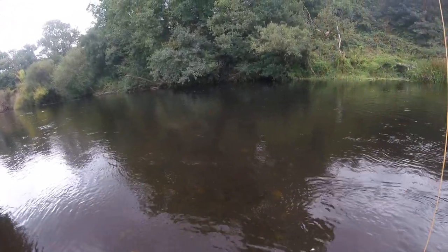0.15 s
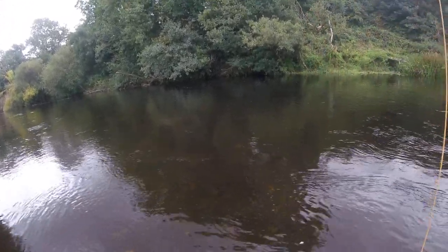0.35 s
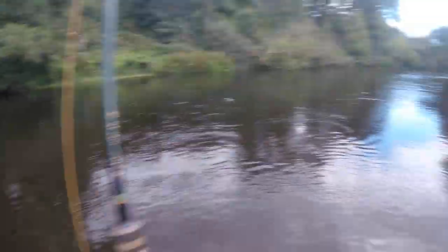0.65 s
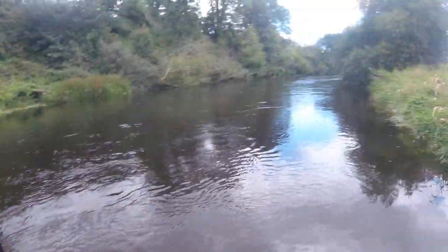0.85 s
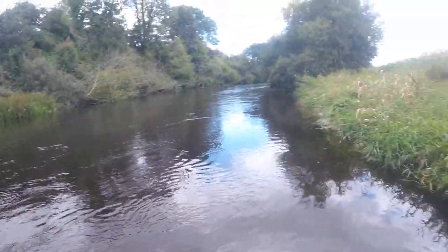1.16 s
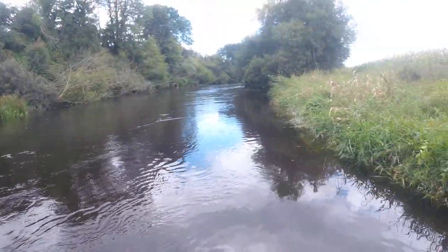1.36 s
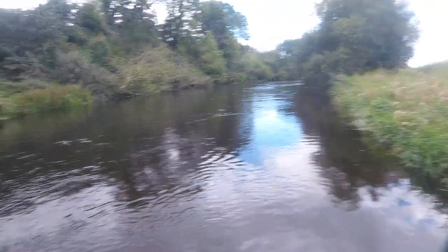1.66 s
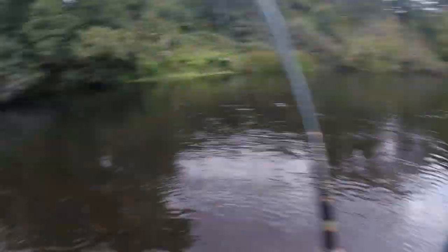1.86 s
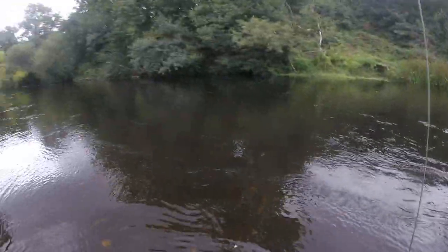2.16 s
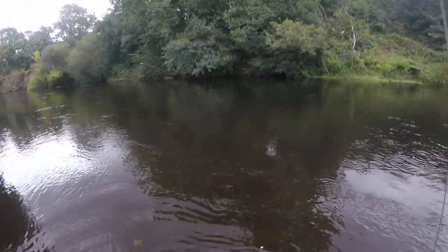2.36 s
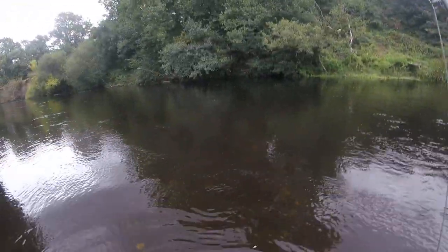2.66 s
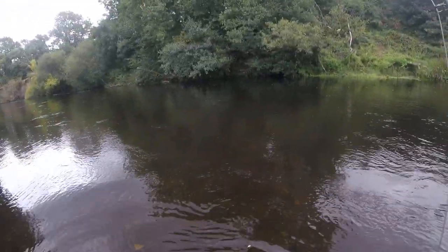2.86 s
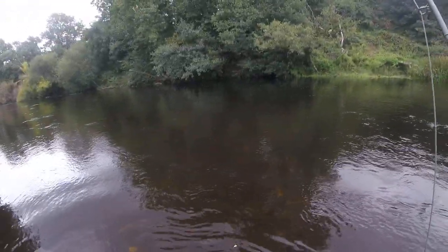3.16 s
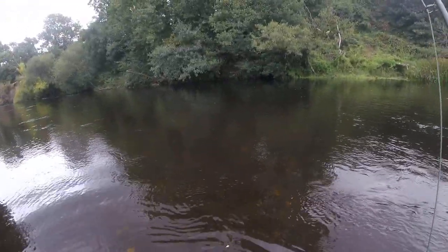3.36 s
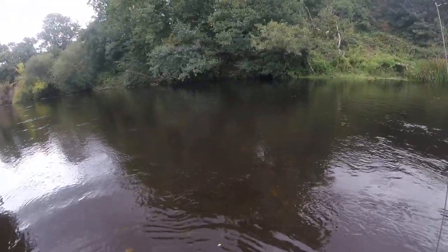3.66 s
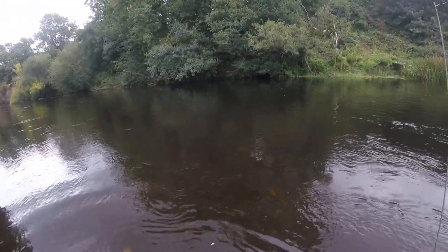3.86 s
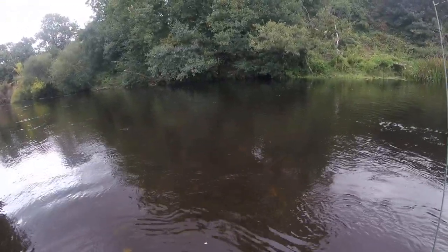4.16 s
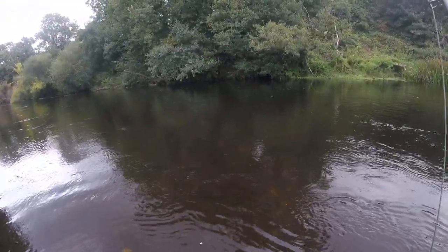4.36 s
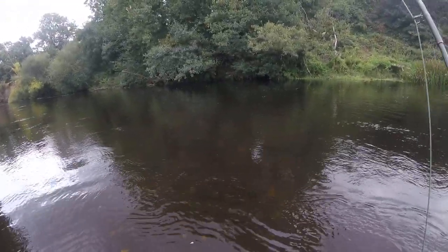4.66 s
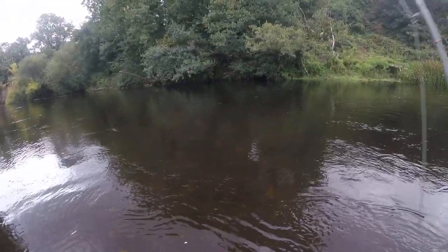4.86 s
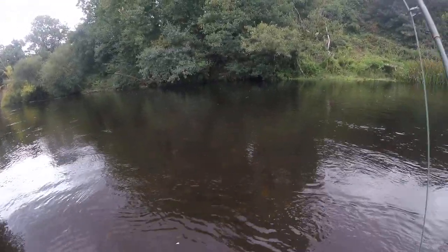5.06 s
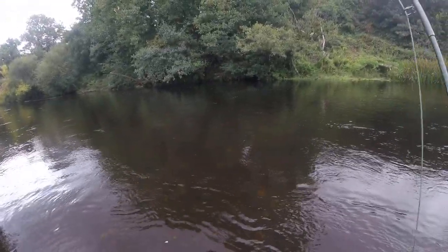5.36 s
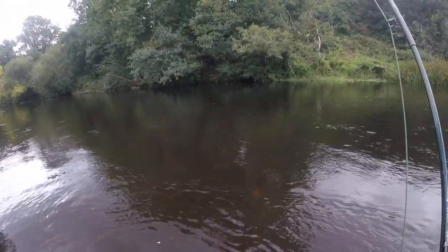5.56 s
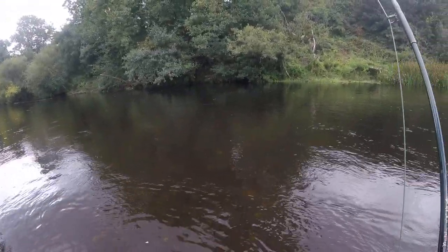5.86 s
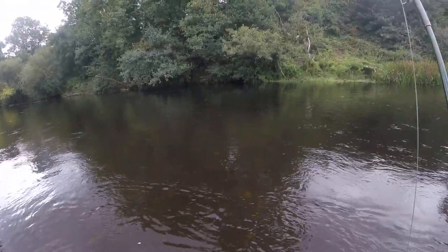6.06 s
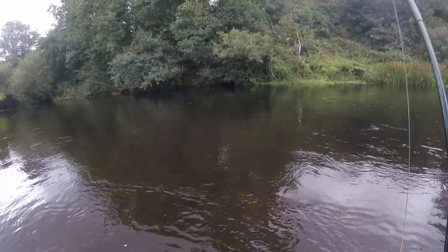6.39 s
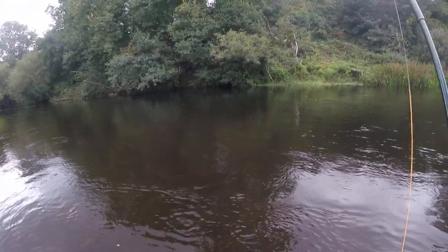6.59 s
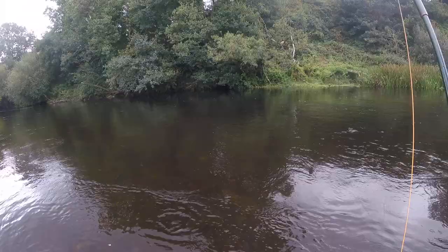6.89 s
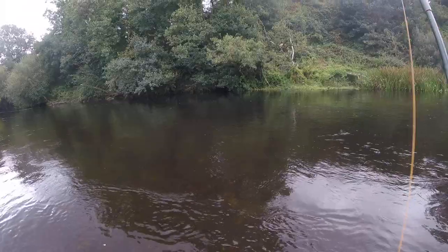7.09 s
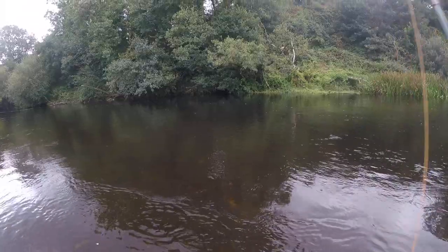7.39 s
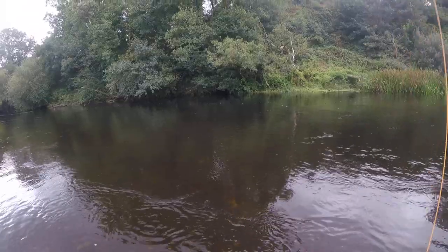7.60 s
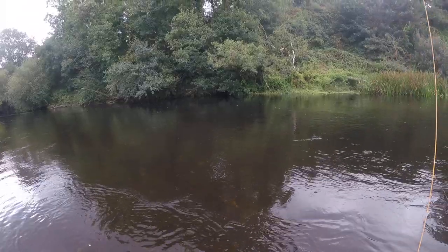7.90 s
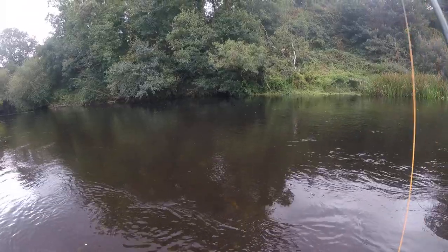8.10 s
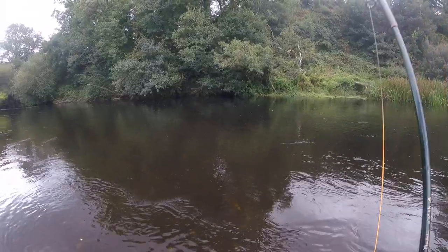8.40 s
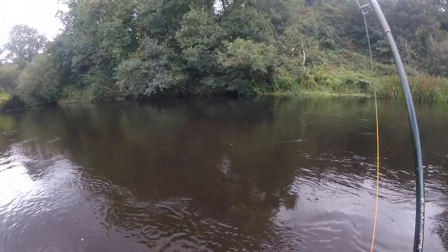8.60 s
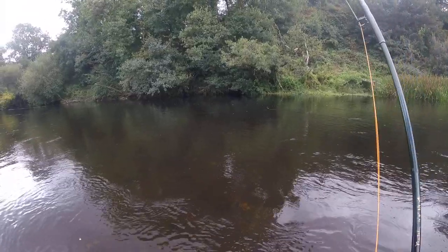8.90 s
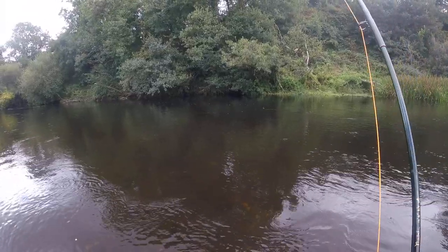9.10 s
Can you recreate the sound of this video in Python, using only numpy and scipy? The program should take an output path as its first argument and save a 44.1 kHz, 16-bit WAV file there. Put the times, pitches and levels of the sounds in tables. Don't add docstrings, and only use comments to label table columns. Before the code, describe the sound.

A quiet riverbank, heard close through a closed housing: soft, muffled water hush and barely audible wind rumble throughout. From 0 to 0.9 s, light brushes and rod knocks, a tiny rising bubble blip near 0.6 and a cloth rustle. At 1.1 a fly reel ratchet starts softly at about 50 clicks a second, quickening to a firm, wavering metallic buzz above 100 until 2.7, with dull hand bumps and a hard handle knock at 2.6. A faint dove coos around 2.9-3.8. Sharp, loud, irregular ticks run from 3.9 to 4.7, then a short hard burst at 4.8-5.0 and two lone clicks. A fast zip rises and falls at 5.5-6.2, a softer one at 6.3-6.8. One soft tick follows at 7.2. Around 8.0-8.4 come knocks and a very faint, loose turn. A softer, jerky buzz surges from 8.7 to the end at 9.2.

```python
import sys
import numpy as np
from scipy import signal
from scipy.fft import rfft, irfft
from scipy.io import wavfile
from scipy.ndimage import uniform_filter1d

SR = 44100
rng = np.random.default_rng(int(sys.argv[2]) if len(sys.argv) > 2 else 0)


def voltage_ratio(level):
    return 10 ** (np.asarray(level, float) / 20)


def int16_out(signal):
    q = np.round(np.clip(np.atleast_2d(signal).T, -1, 1) * 32767)
    wavfile.write(sys.argv[1], SR, q.astype(np.int16))


N = 407484


def evened(x):
    return x / np.sqrt(np.mean(x ** 2) + 1e-20)


def add(mix, s, sounds):
    at = np.round(np.asarray(s) * SR).astype(int)[:, None] + np.arange(sounds.shape[1])
    np.add.at(mix, np.clip(at, 0, N - 1), sounds * (at < N))


def read(points, hz):
    f, db = np.transpose(points)
    return np.interp(np.log(hz + 1), np.log(f + 1), db)


# (time [s], level [dB])
RUMBLE = [(0.0, -65.5), (2.57, -71), (3.32, -74), (8.1, -76), (8.9, -69), (9.24, -70)]
GUST_DB, GUST_S = 2.5, 0.15


def rumble():
    low = signal.sosfilt(signal.butter(1, 45, fs=SR, output="sos"), rng.standard_normal(N))
    low = signal.sosfilt(signal.butter(2, 62, fs=SR, output="sos"), low)
    t = np.arange(N) / SR
    gusts = np.interp(t / GUST_S, np.arange(200), rng.standard_normal(200))
    level_db = np.interp(t, *np.transpose(RUMBLE)) + 1.5 + GUST_DB * gusts
    return voltage_ratio(level_db) * evened(low)


# (frequency [Hz], density [dB per Hz])
HUSH = [(110, -70), (150, 0.5), (420, -11.5), (1000, -14.5), (2000, -21), (3400, -29), (4300, -33),
        (5300, -23), (6000, -28.5), (7000, -26.5), (9500, -30), (12000, -37.5), (15250, -40.5),
        (15400, -73)]
# (time [s], level [dB], fill [0-1])
AIR = [(0.0, -54.5, 0.75), (1.34, -53.5, 0.75), (1.83, -50, 1), (2.62, -48.5, 1), (2.98, -54.5, 0.65),
       (3.86, -54.5, 0.7), (4.12, -53.5, 1), (6.3, -54.5, 0.88), (6.84, -55.5, 0.48), (8.31, -54, 0.1),
       (8.49, -55, 0.24), (9.24, -53, 0.5)]
DIP_DB, FILL_DB, HISS_DB = -17.5, 22, 0.05


def hush():
    frames, hz = N // 512 + 5, np.fft.rfftfreq(2048, 1 / SR)
    a, b, patches = rng.standard_normal((frames, 1025, 3)).T
    patches = uniform_filter1d(patches, size=20, axis=0)
    patches = evened(uniform_filter1d(patches, size=8, axis=1))
    s, level_db, fill = np.transpose(AIR)
    t = np.arange(frames) * 512 / SR
    high = np.clip(np.log2(hz / 1000 + 1e-3), 0, 2) / 2
    field_db = read(HUSH, hz)[:, None] + patches + HISS_DB * high[:, None]
    dip = np.exp(-((hz - 4800) / 800) ** 2)
    field_db += np.outer(dip, DIP_DB + FILL_DB * np.interp(t, s, fill))
    spectra = (a + 1j * b) * voltage_ratio(field_db)
    noise = evened(signal.istft(spectra, nperseg=2048, noverlap=1536)[1][:N])
    return voltage_ratio(np.interp(np.arange(N) / SR, s, level_db) + 3.5) * noise


# (start [s], length [s], pitch [Hz], level [dB])
DOVE = [
    (2.93, 0.3, 531, -57),
    (3.22, 0.07, 500, -55),
    (3.34, 0.11, 535, -59),
    (3.5, 0.35, 520, -68),
]
COO_PEAK, COO_DROP = 0.9, 0.036


def dove():
    out = np.zeros(N)
    for start, length, hz, db in DOVE:
        u = np.arange(0, length, 1 / SR) / length
        level = np.interp(u, [0, COO_PEAK, 1], [0.2, 1, 0])
        pitch = hz * (1 - COO_DROP * u ** 8)
        coo = np.sqrt(2) * voltage_ratio(db) * level * np.sin(2 * np.pi * np.cumsum(pitch) / SR)
        add(out, [start], coo[None])
    return out


# (start [s], length [s], first pitch [Hz], last pitch [Hz], level [dB])
BUBBLE = (.568, .058, 620, 1560, -54)


def bubble():
    start, length, first_hz, last_hz, db = BUBBLE
    u = np.arange(0, length, 1 / SR) / length
    pitch = first_hz + (last_hz - first_hz) * np.sin(np.pi * u / 2)
    level = voltage_ratio(db - 13 * u) * np.sin(np.pi * u) ** 0.4
    out = np.zeros(N)
    add(out, [start], (level * np.sin(2 * np.pi * np.cumsum(pitch) / SR))[None])
    return out


# (start [s], top [s], end [s], low edge [Hz], high edge [Hz], level [dB])
RUSTLE = (.66, .81, .85, 4700, 7300, -64)


def rustle():
    start, top, end, low_hz, high_hz, db = RUSTLE
    grain_db = 4 * np.repeat(rng.standard_normal(N // 200 + 1), 200)[:N]
    grains = rng.standard_normal(N) * voltage_ratio(grain_db)
    band = signal.sosfilt(signal.butter(2, [low_hz, high_hz], "band", fs=SR, output="sos"), grains)
    swell = np.interp(np.arange(N) / SR, [start, top, end], [0, 1, 0])
    return voltage_ratio(db) * swell * evened(band)


# (time [s], peak [dB], frequency [Hz], t60 [s])
KNOCKS = [
    (0.202, -31, 824, 0.021),
    (0.239, -39, 720, 0.028),
    (0.792, -32, 736, 0.028),
    (2.604, -16.5, 505, 0.034),
    (7.984, -26, 493, 0.046),
    (8.421, -26, 710, 0.02),
    (8.434, -32.5, 742, 0.07),
    (8.455, -34.5, 770, 0.078),
]
BUMPS = [
    (1.286, -40, 183, 0.14),
    (1.484, -70, 162, 0.13),
    (1.623, -24.5, 178, 0.084),
    (1.844, -35.5, 190, 0.12),
    (2.086, -26, 185, 0.1),
    (2.462, -38, 170, 0.16),
]
BRUSHES = [(0.0654, -48, 5060, 0.03), (0.118, -36, 5400, 0.021), (0.2179, -44, 5230, 0.035),
           (0.8044, -45, 6340, 0.068), (0.8287, -41, 5000, 0.025), (0.8444, -58, 4940, 0.03),
           (2.9213, -42, 5000, 0.026), (3.2121, -48, 5400, 0.03), (3.5309, -49, 5740, 0.03),
           (3.7394, -49, 4200, 0.03), (7.2044, -45, 6130, 0.027), (8.4856, -49, 5670, 0.03)]
TAPS = [
    (0.1186, -37, 2660, 0.019),
    (0.24, -35, 1510, 0.022),
    (0.802, -40, 2470, 0.031),
    (0.841, -36, 2580, 0.014),
    (2.9294, -56, 2400, 0.02),
]


def knocks(rows, rise_s, grit, size):
    s, db, hz, t60 = np.transpose(rows)[..., None]
    t = np.arange(6000) / SR
    noise = evened(uniform_filter1d(rng.standard_normal((len(s), len(t))), size=size))
    ring = np.sin(2 * np.pi * hz * t) * (1 - grit + grit * noise)
    out = np.zeros(N)
    add(out, s[:, 0], voltage_ratio(db - 60 * t / t60) * (1 - np.exp(-t / rise_s)) * ring)
    return out


# (time [s], teeth passing [per s])
SPIN = [
    [(1.07, 46.9), (1.424, 55.1), (1.532, 78.2), (1.753, 96.4), (1.984, 97.4), (2.077, 109.2),
     (2.452, 94.8), (2.475, 135.1), (2.695, 98.8), (2.731, 16.4)],
    [(4.799, 22.2), (4.844, 81.3), (4.881, 116.3), (4.917, 92.0), (4.955, 60.4), (5.0, 87.7), (5.028, 58.1)],
    [(5.535, 32.2), (5.643, 69.3), (5.706, 66.7), (5.775, 124.7), (5.859, 161.9), (5.98, 206.9),
     (6.119, 97.9), (6.228, 50.2)],
    [(6.327, 35.5), (6.367, 65.6), (6.393, 66.8), (6.5, 96.0), (6.565, 134.7), (6.656, 133.8),
     (6.679, 116.9), (6.769, 15.1)],
    [(7.999, 30.2), (8.082, 60.4), (8.11, 30.4), (8.188, 47.2), (8.235, 73.2), (8.308, 23.8), (8.332, 39.5)],
    [(8.67, 21.3), (8.797, 122.6), (8.887, 16.2), (8.944, 99.1), (9.165, 64.2), (9.233, 164.7)],
]
# (time [s], snap [dB], ring freed [dB], thud freed [dB])
BLOWS = [
    [(1.07, -32.5, -2, 0.5), (1.28, -34, 1.5, 0.5), (1.49, -32, 2, 0), (1.56, -30, -5, 1.5),
     (1.62, -31, 3, 4), (1.68, -29.5, -3, 0.5), (1.75, -26.5, -3, 3.5), (1.795, -21.5, -13, -1),
     (1.84, -28.5, 5, 4), (1.9, -29.5, 0.5, 2.5), (2.1, -25, -1.5, 0.5), (2.3, -25.5, 0, 0.5),
     (2.52, -25.5, 0, -2), (2.66, -27.5, 5.5, -5), (2.731, -24.5, 0.5, -8)],
    [(4.799, -14.5, 0.5, 0), (4.84, -16.5, -0.5, 2), (4.875, -16, -3, -4), (4.91, -19, 1, 1),
     (4.952, -24, 1.5, -7), (5.028, -19.5, -4.5, 1.5)],
    [(5.535, -19.5, 0.5, 0), (5.622, -18, 3, 3), (5.7, -20.5, 0.5, 2.5), (5.795, -21.5, 1, 1.5),
     (5.9, -24, 0, 1), (6.0, -24.5, 0, 1.5), (6.142, -26.5, -4, -0.5), (6.228, -28, -0.5, 3)],
    [(6.326, -26, -2, 0), (6.415, -29.5, 0.5, -2), (6.52, -27.5, -0.5, -0.5), (6.6, -28.5, 0.5, -1.5),
     (6.68, -28, 0, -4), (6.768, -30, -5.5, -3)],
    [(7.999, -40, -2.5, 3.5), (8.1, -38.5, -2, 0), (8.221, -38.5, -4, 0), (8.369, -37, -3, -2)],
    [(8.67, -29, -3, 6), (8.751, -31, -2, 4), (8.831, -28.5, -3, 2.5), (8.9, -30, 1, 2),
     (8.95, -30, -2, -1), (9.02, -30.5, 1, -0.5), (9.06, -34, 5, -2), (9.12, -34, 5, -0.5),
     (9.18, -32, 3, -3), (9.233, -30.5, 5, -6.5)],
]
# (usual snap [dB], ring over snap [dB], thud over snap [dB])
BODY = [
    (-28.5, -1, -5),
    (-16, -2.5, -18.5),
    (-24.5, -0.5, -7.5),
    (-30, 1, -0.5),
    (-37.5, 7, -2),
    (-29.5, -1, -2),
]
# (time [s],
# extra teeth at the top [per s])
TUGS = [(1.069, -3.5), (1.13, 26.5), (1.337, 19.3), (1.381, -20.0), (1.447, -8.5), (1.537, 39.8),
        (1.614, 45.6), (1.704, -6.4), (1.806, 26.4), (1.897, 33.6), (2.023, 51.9), (2.135, 11.4),
        (2.235, 62.8), (2.328, 44.7), (2.423, 76.2), (2.563, -33.7), (2.631, 70.8), (5.58, 1.5),
        (5.639, 18.9), (5.876, 14.6), (5.93, -1.0), (6.04, -5.5), (6.177, 60.2), (8.797, 21.6),
        (8.881, 142.6), (9.013, 113.1),
        (5.985, -6),
    (6.025, 6),
]
TUG_S = 0.045
RING_LAG, THUD_LAG = 0.59, 0.93


def teeth(spin, blows, body):
    s, per_s = np.transpose(spin)
    t = np.arange(s[0], s[-1], 1 / SR)
    speed = np.interp(t, s, per_s)
    for at, extra in TUGS:
        speed += extra * np.maximum(1 - abs(t - at) / TUG_S, 0)
    angle = np.cumsum(speed) / SR
    when = np.interp(np.arange(int(angle[-1] + 1.3)), angle, t)
    at, *effort = np.transpose(blows)
    snap_db, ring_free_db, thud_free_db = (np.interp(when, at, column) for column in effort)
    usual_db, ring_db, thud_db = body
    harder_db = snap_db - usual_db
    ring_db = ring_db + ring_free_db - RING_LAG * harder_db
    thud_db = thud_db + thud_free_db - THUD_LAG * harder_db
    return np.transpose([when, snap_db, ring_db, thud_db])


TEETH_A_TURN, SHUT_TOOTH = 24, 12
SNAP_SWAY, SNAP_SWAY_TURN = 0.37, 0.71
SWAY_TWICE = 0.29
SWAY_PITCH = 0.026


def spool_sway(hz, speed, sway_db):
    spool = (np.arange(len(speed))[:, None] - SHUT_TOOTH) / TEETH_A_TURN
    swayed = sway_db * np.clip((speed[:, None] - 65) / 40, 0, 1)
    low_ring = abs(hz - 2200) < 300
    high_ring = abs(hz - 2900) < 400
    low_snap = abs(hz - 5100) < 200
    crest = 0.57 * low_ring + 0.071 * high_ring + SNAP_SWAY_TURN * low_snap
    wave = np.cos(2 * np.pi * (spool - crest))
    wave = wave + SWAY_TWICE * np.cos(4 * np.pi * (spool - crest - 0.05))
    level_db = swayed * (low_ring + high_ring + SNAP_SWAY * low_snap) * wave
    bend = SWAY_PITCH * swayed * low_ring * (0.15 - (spool % 1) ** 3)
    return level_db, bend


# (frequency [Hz], density [dB per Hz])
CRACK = [(450, -59), (600, -9.5), (1800, -16), (3200, -7), (4300, -18), (5000, 2), (7000, -4), (8800, -7.5),
         (10500, -11), (11300, -20), (13500, -27), (15000, -33), (16500, -50)]


def cracks(t, rise, scatter, size, calm, slid, slide):
    kept, fresh = rng.standard_normal((len(calm), len(t), 2)).T
    noise = (0.78 * np.sqrt(size) * uniform_filter1d(kept, size=size) + 2 * scatter * fresh).T
    noise = noise * voltage_ratio(-60 * t / 0.01) * rise
    bins = np.fft.rfftfreq(len(t), 1 / SR)
    colour_db = read(CRACK, bins) + slid * read(slide, bins) - 1.3 * np.outer(calm, bins < 4300)
    return irfft(rfft(noise) * voltage_ratio(colour_db), len(t)) * (1 - t / t[-1]) ** 2


STRIKE_S, STRIKE_CURVE = 0.0015, 2.3
CALM = 0.72
DAMP_DB, DAMP_S = 9, 0.01
LOW_RING_GAIN, HIGH_SNAP_LOSS = 0.11, 0.43
EVEN_SPRING = 0.7


def clicks(rows, modes, pawl, slide, size):
    s, snap_db, ring_db, thud_db = np.transpose(rows)
    hz, mode_db, t60 = np.transpose(modes)[..., None, None]
    delay_s, rebound_db, drift, scatter, crack_db, sway_db = pawl
    speed = 1 / abs(np.gradient(s))
    calm = CALM * np.clip((speed - 115) / 40, 0, 1)
    t = np.arange(1300) / SR
    rise = np.minimum(t / STRIKE_S, 1) ** STRIKE_CURVE
    slid = np.linspace(-0.5, 0.5, len(s))[:, None]

    slow, quick = rng.standard_normal((len(s), len(hz), 3, 2)).T
    near_alike = np.sqrt(size) * uniform_filter1d(slow, size=size)
    chance = drift * near_alike + scatter * quick
    tune, weight, phase = chance[..., None] * (1 - calm[:, None] * (hz < 4300))

    swing_db, bend = spool_sway(hz, speed, sway_db)
    pitch = hz * (1 + 0.014 * tune * np.clip(hz / 4000, 1, 2) + bend)
    turn = 2 * np.pi * pitch * (t - STRIKE_S) + np.pi / 2
    turn += np.pi * np.arange(len(hz))[:, None, None] * np.clip(hz // 1900 / 2, 0, 1)
    turn += 2.82 * np.clip(hz / 5000, 0.05, 1.5) * phase

    harder_db = (snap_db - snap_db.mean())[:, None]
    tilt = LOW_RING_GAIN * (abs(hz - 2250) < 200) - HIGH_SNAP_LOSS * (abs(hz - 6200) < 800)
    mode_db = mode_db + slid * read(slide, hz) + harder_db * tilt
    choke_db = DAMP_DB * (hz > 1900) * (t / DAMP_S) ** 2
    rings = voltage_ratio(mode_db + 4.8 * weight + swing_db - 60 * t / t60 - choke_db) * rise * np.sin(turn)
    mode_hz = hz[:, 0, 0]
    thud = rings[mode_hz < 1900].sum(0)
    ring = rings[(mode_hz >= 1900) & (mode_hz < 4300)].sum(0)
    snap = rings[mode_hz >= 4300].sum(0)

    crack = cracks(t, rise, scatter, size, calm, slid, slide)
    out = evened(snap) + voltage_ratio(crack_db) * evened(crack)
    out /= out.std(1, keepdims=True) ** EVEN_SPRING
    out += voltage_ratio(ring_db)[:, None] * evened(ring) + voltage_ratio(thud_db)[:, None] * evened(thud)
    lag = round(min(delay_s, 0.01) * SR)
    out[:, lag:] += voltage_ratio(rebound_db + 5 * weight[0]) * np.diff(out, prepend=0)[:, :-lag] * 0.95
    late_s = 0.004 * scatter ** 2 * quick[0, 0] * (1 - calm)
    return s + late_s - 0.0006, out * voltage_ratio(snap_db - 13.5)[:, None]


# (time [s], snap [dB], ring over snap [dB], thud over snap [dB])
TICKS = [(3.8812, -16.5, 1, -15), (3.9139, -17, 0, -14), (3.9397, -16, 0.5, -16),
         (3.9688, -15.5, -2.5, -14), (4.0513, -16.5, -1.5, -15), (4.1758, -16, 0, -16.5),
         (4.2312, -16, -0.5, -17), (4.3495, -16, -0.5, -17), (4.5367, -16.5, -0.5, -16),
         (4.6767, -17, 0.5, -15), (4.7306, -15.5, -1, -24)]
NUDGES = [
    (7.872, -41, 3.8, 3),
    (7.941, -41, 5.3, 4),
    (8.37, -41, 7.5, -6),
]
LONE = [
    (5.1522, -18, -7, -14),
    (5.3061, -17, -7.5, -13),
    (7.178, -29.5, -3, -1.5),
]
# (frequency [Hz], level [dB], t60 [s])
CUPPED = [(578, -4.5, 0.081), (720, 2.5, 0.054), (845, 1.5, 0.019), (1570, 4, 0.0088), (2270, 2, 0.035),
          (2413, 9.5, 0.013), (2806, -4.5, 0.02), (2970, -23, 0.012), (3710, -10.5, 0.028),
          (5203, 4.5, 0.0089), (5350, 10, 0.0095), (5545, -3.5, 0.015), (6140, 5.5, 0.0075),
          (6550, 3, 0.0051), (6680, -3.5, 0.016), (7500, 3.5, 0.0065), (8860, 2, 0.0051)]
PINCHED = [(634, -4.5, 0.12), (896, -1, 0.043), (1055, 7.5, 0.027), (1283, 2, 0.04), (1650, -27, 0.022),
           (2350, 0, 0.08), (2547, 4, 0.049), (2730, 2.5, 0.019), (3065, 3.5, 0.016), (3300, -1, 0.012),
           (3710, -10.5, 0.042), (5080, -1, 0.015), (5400, -0.5, 0.012), (5670, -1.5, 0.011),
           (6320, -2.5, 0.0073), (7350, -7, 0.012), (7260, -18, 0.021), (7370, -14, 0.0084),
           (8760, 0, 0.0077)]
OPEN = [(580, -10.5, 0.067), (736, 0, 0.021), (800, -5, 0.021), (1050, -8, 0.0059), (1274, -10, 0.059),
        (1660, -11, 0.015), (2254, -2, 0.025), (2700, -4, 0.018), (2592, 1.5, 0.026), (3035, -1, 0.022),
        (3330, -7, 0.022), (3770, -15.5, 0.03), (4980, -3, 0.012), (5580, 5.5, 0.0063), (5400, 8, 0.0073),
        (6180, 7, 0.0061), (7580, -16.5, 0.031), (8550, 4, 0.0054), (8900, 4, 0.0052), (10400, -1, 0.0052),
        (13400, -14, 0.0064)]
LOOSE = [(684, 1.5, 0.01), (1140, 5.5, 0.0065), (2330, 13, 0.0079), (2670, 0, 0.024), (2775, -1, 0.024),
         (3840, -4.5, 0.0092), (4960, 2, 0.0043), (5500, 3.5, 0.0065), (6340, -5, 0.01), (7830, 7, 0.0048)]
TURNED = [(580, -8, 0.057), (802, 4.5, 0.019), (1284, -6.5, 0.052), (1620, -9, 0.014), (2306, -2.5, 0.019),
          (2630, -1, 0.02), (2994, -9, 0.059), (3240, -7.5, 0.028), (3680, -16, 0.032), (4500, 12, 0.0022),
          (5600, -1, 0.0078), (5970, -1.5, 0.013), (6440, -10, 0.016), (7860, -12, 0.0081)]
EASED = [(770, 7, 0.018), (1160, -11, 0.029), (2430, 1.5, 0.019), (2540, -4, 0.03), (3080, 0, 0.015),
         (3120, -4, 0.018), (3620, -11, 0.034), (5060, -6, 0.017), (5200, 16, 0.0053), (5700, -3, .012),
         (6340, 0, 0.0088), (6730, -13, 0.01), (7200, -13, 0.0042), (8610, 0, 0.0061)]
# (rebound delay [s], held to 0.01 s, rebound [dB], drift over a few teeth [0-1],
# scatter tooth to tooth [0-1], crack [dB], sway [dB])
PAWL_CUPPED = (.004, -8, .32, .3, -2, 4.5)
PAWL_PINCHED = (0.4, -20, 0.28, 0.24, -3, 3.5)
PAWL_OPEN = (.003, -25, .4, .2, -2, 0)
PAWL_LOOSE = (.004, -45, .3, .24, -2, 0)
PAWL_TURNED = (.003, -30, .42, .3, -1, 0)
PAWL_EASED = (.004, -30, .05, .18, -3, 0)
# (frequency [Hz], shift [dB])
SLIDES = [
    [(550, 19.5), (900, -7), (2000, -0.5), (2400, -6), (3100, -10), (4300, 0), (5100, 10.5), (5900, -0.5),
     (9000, 5.5)],
    [(600, 0), (800, 5.5), (2300, 3), (3100, 6), (3700, 11.5), (5000, -4.5), (6200, 2.5), (11000, 3.5)],
    [(560, 4), (800, 5), (2250, 1), (2490, -5), (2660, 6), (3000, 5), (4950, -5), (5500, 4), (7500, 3),
     (12000, -5.5)],
    [(700, 7.5), (2300, 2.5), (2900, 0), (5000, -3.5), (6300, 7), (9000, -4)],
    [(580, 14), (2250, -1), (3100, -8), (4700, 4), (6000, 1), (9000, 7)],
    [(700, 0.5), (2300, -4), (3100, -5), (5000, 4), (6300, -3), (9000, -3.5)],
]


def reel():
    runs = [teeth(*run) for run in zip(SPIN, BLOWS, BODY)]
    pinched = np.vstack([TICKS, runs[1]])
    opened = np.vstack(runs[2:4])
    loose = np.vstack([NUDGES[:2], runs[4], NUDGES[2:]])
    out = np.zeros(N)
    add(out, *clicks(runs[0], CUPPED, PAWL_CUPPED, SLIDES[0], size=7))
    add(out, *clicks(pinched, PINCHED, PAWL_PINCHED, SLIDES[1], size=7))
    add(out, *clicks(opened, OPEN, PAWL_OPEN, SLIDES[2], size=9))
    add(out, *clicks(loose, LOOSE, PAWL_LOOSE, SLIDES[3], size=5))
    add(out, *clicks(runs[5], TURNED, PAWL_TURNED, SLIDES[4], size=7))
    add(out, *clicks(LONE, EASED, PAWL_EASED, SLIDES[5], size=3))
    return signal.sosfilt(signal.butter(6, 470, "high", fs=SR, output="sos"), out)


def surroundings(x):
    t = np.arange(5000) / SR
    sparse = rng.standard_normal(len(t)) * (rng.random(len(t)) < 0.25)
    taps = sparse * voltage_ratio(-60 * t / 0.0093) * (t > 0.004)
    return signal.oaconvolve(x, taps / np.linalg.norm(taps))[:N]


def scene():
    near = reel() + knocks(KNOCKS, rise_s=0.00061, grit=0.27, size=45)
    near += knocks(BUMPS, rise_s=0.0068, grit=0.043, size=45)
    near += knocks([*BRUSHES, *TAPS], rise_s=0.00092, grit=0.58, size=20)
    air = near + voltage_ratio(-18.5) * surroundings(near) + hush() + dove() + bubble() + rustle()
    heard = signal.sosfilt(signal.butter(10, 130, "high", fs=SR, output="sos"), air)
    return (heard + rumble())[None]


def top_cut(x):
    return signal.sosfilt(signal.butter(12, 16000, fs=SR, output="sos"), x)


def record(dry):
    return top_cut(dry)


dry = scene()
out = record(dry)
int16_out(out)
```